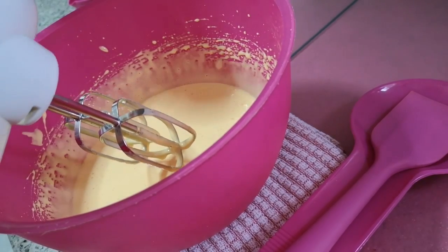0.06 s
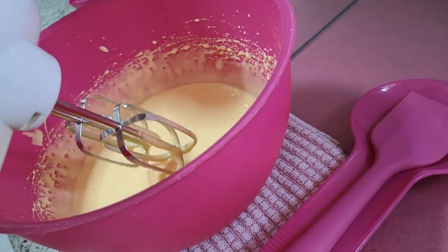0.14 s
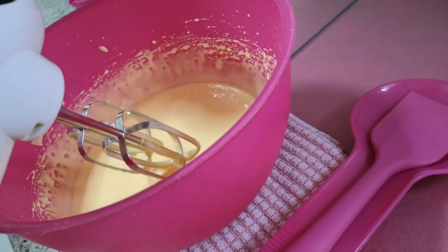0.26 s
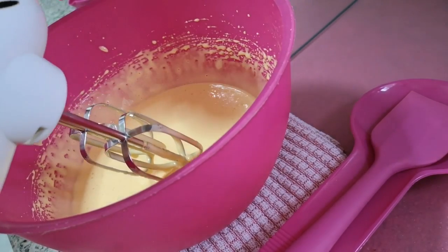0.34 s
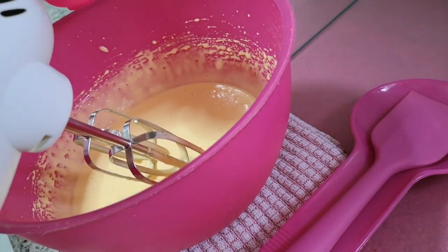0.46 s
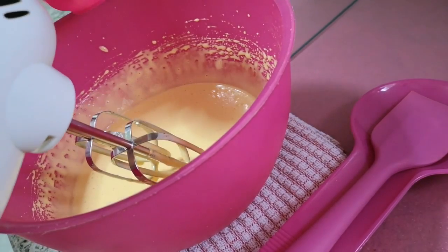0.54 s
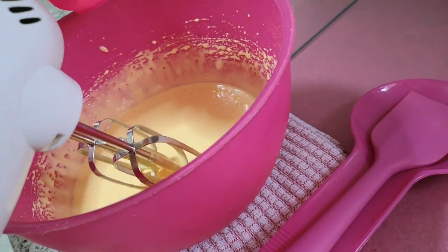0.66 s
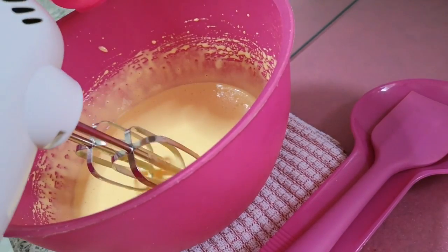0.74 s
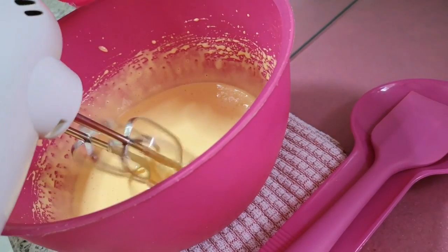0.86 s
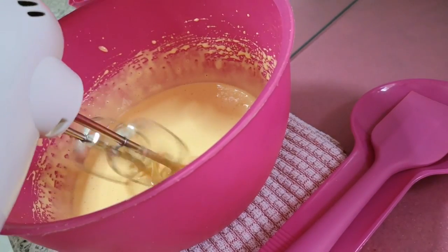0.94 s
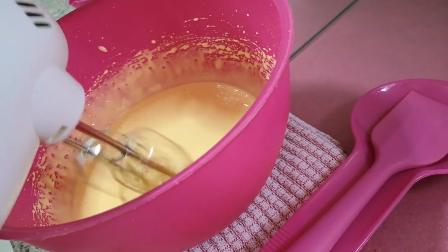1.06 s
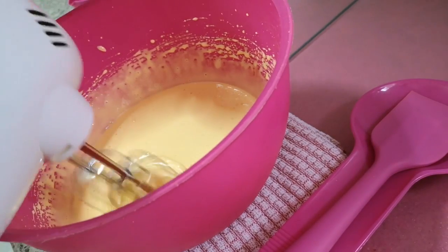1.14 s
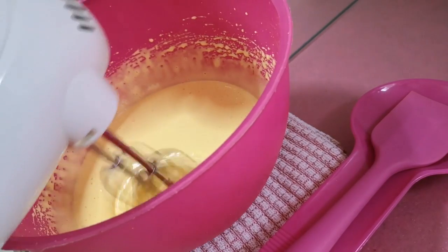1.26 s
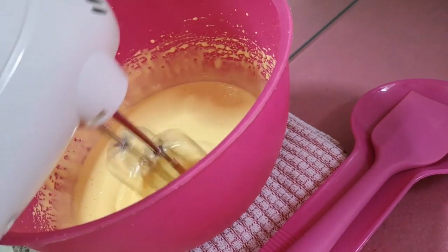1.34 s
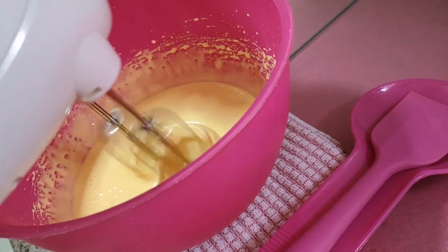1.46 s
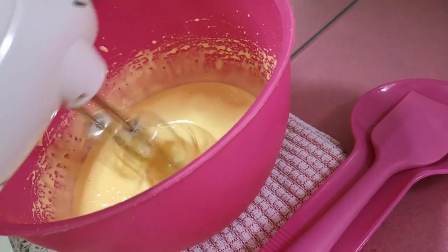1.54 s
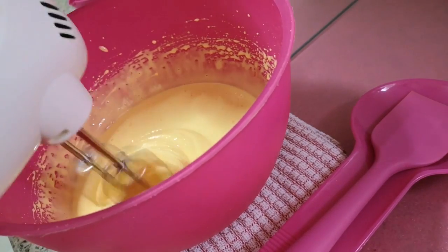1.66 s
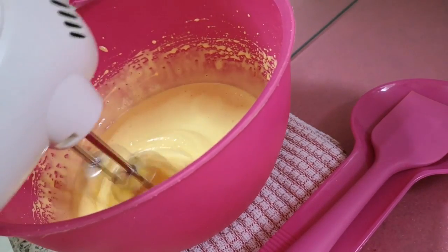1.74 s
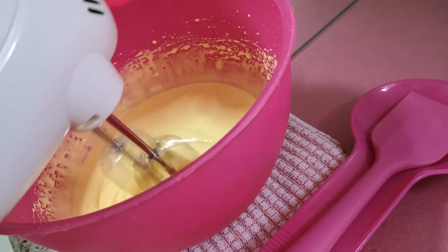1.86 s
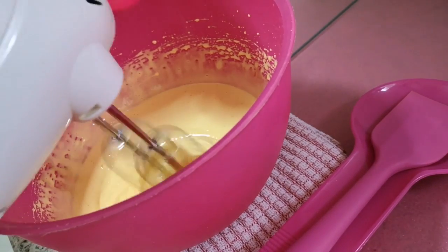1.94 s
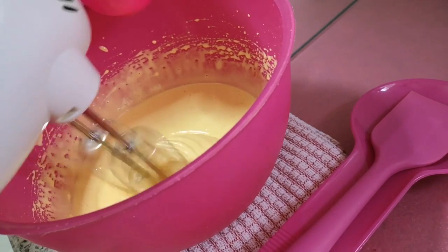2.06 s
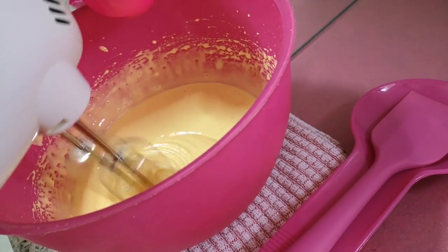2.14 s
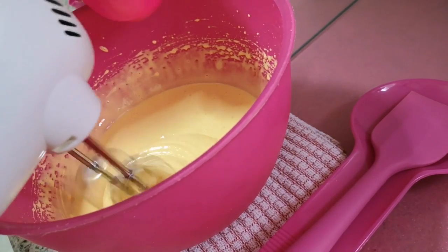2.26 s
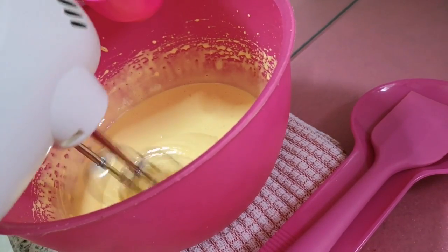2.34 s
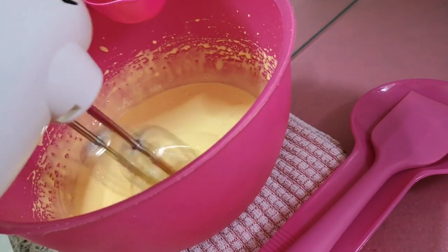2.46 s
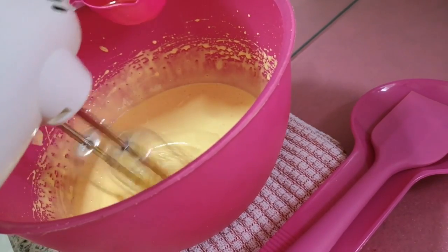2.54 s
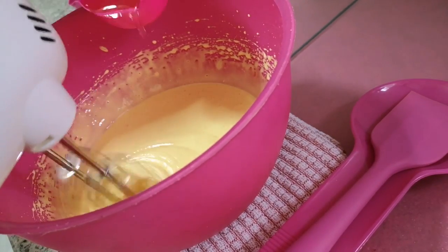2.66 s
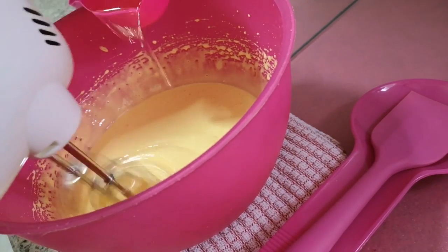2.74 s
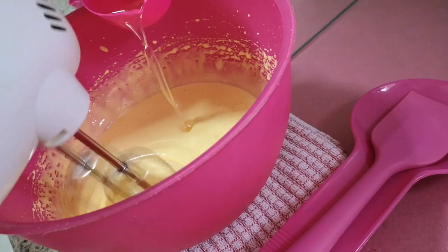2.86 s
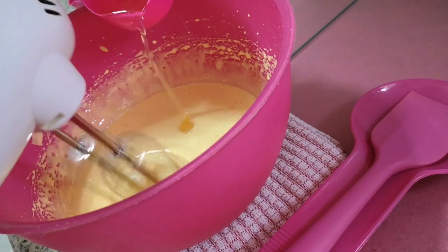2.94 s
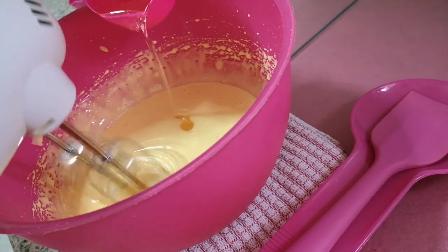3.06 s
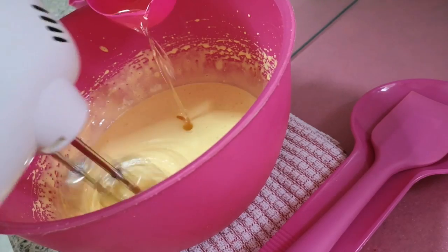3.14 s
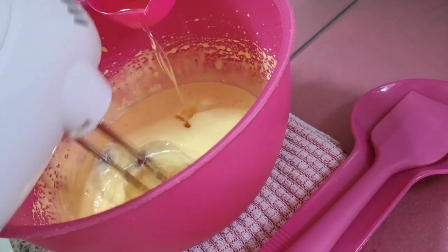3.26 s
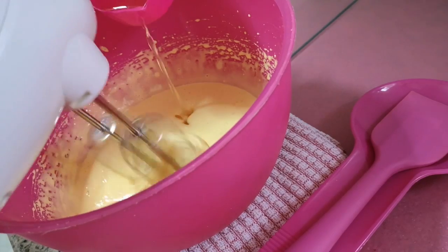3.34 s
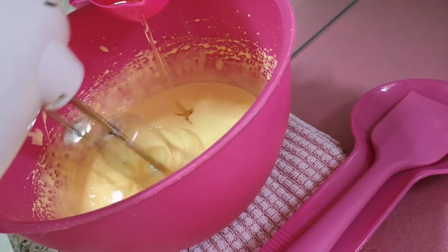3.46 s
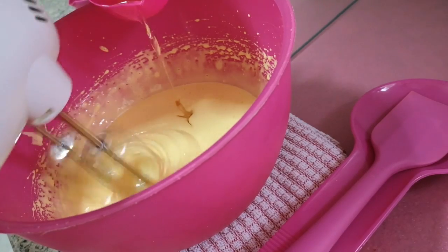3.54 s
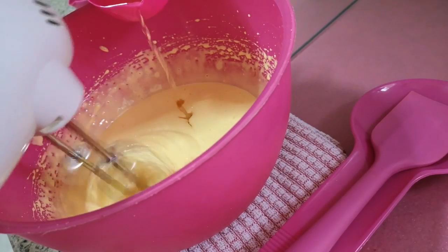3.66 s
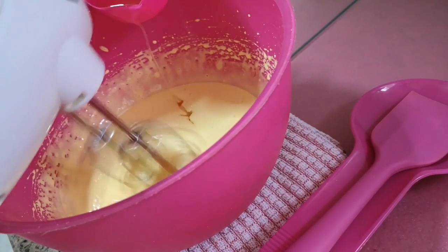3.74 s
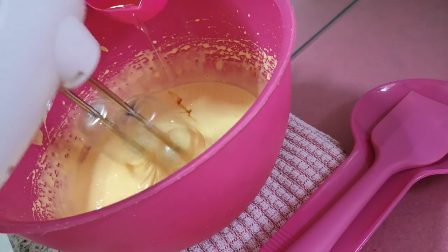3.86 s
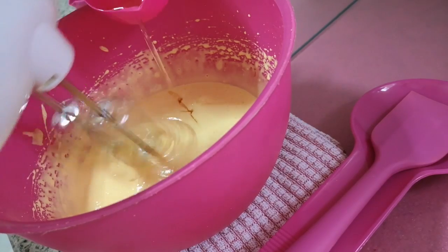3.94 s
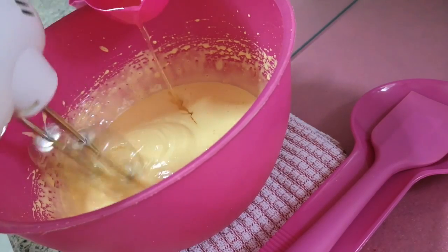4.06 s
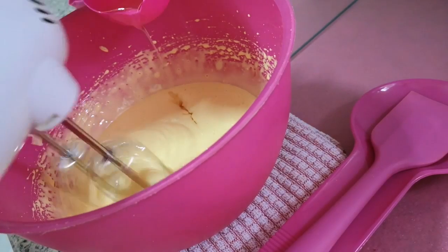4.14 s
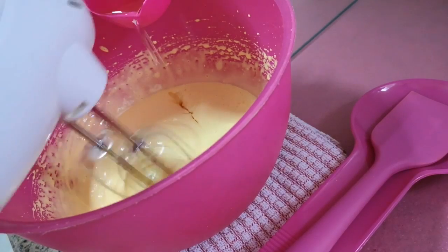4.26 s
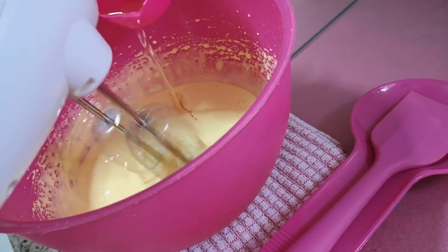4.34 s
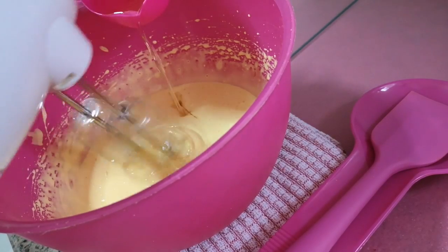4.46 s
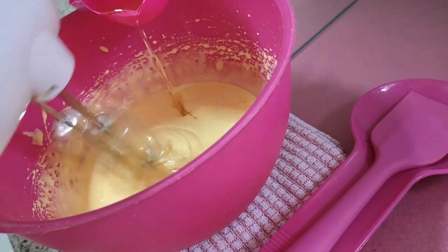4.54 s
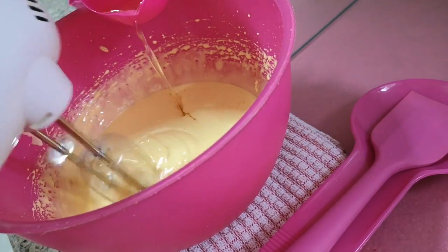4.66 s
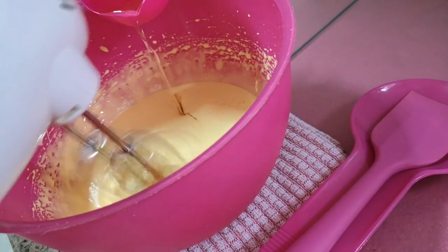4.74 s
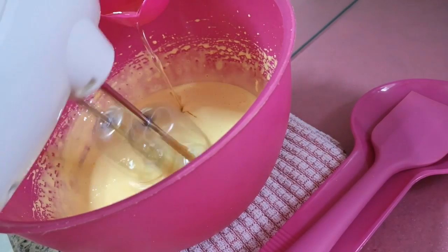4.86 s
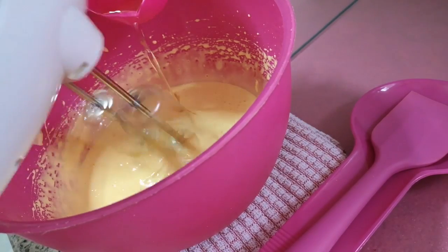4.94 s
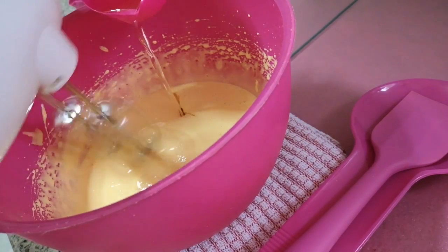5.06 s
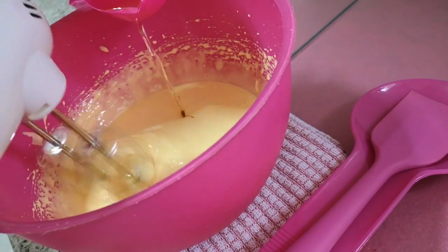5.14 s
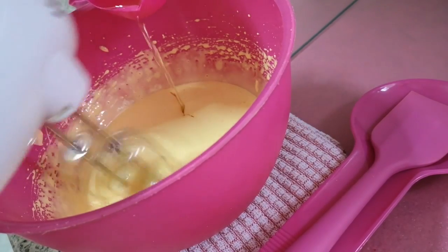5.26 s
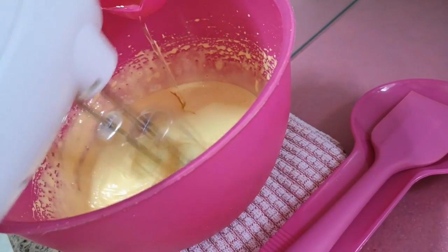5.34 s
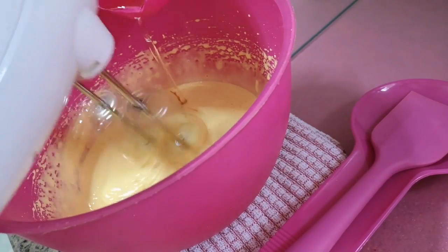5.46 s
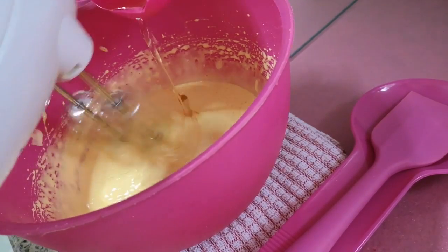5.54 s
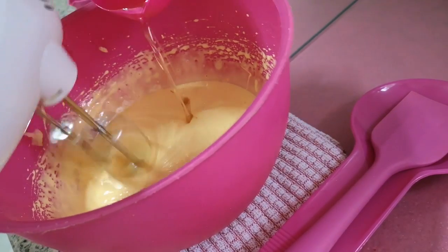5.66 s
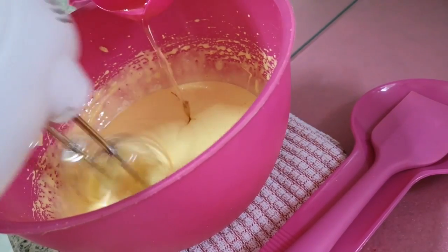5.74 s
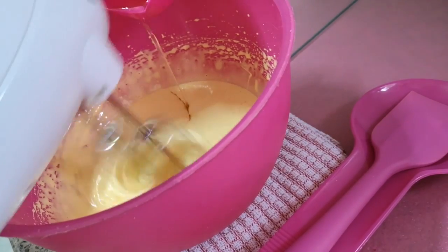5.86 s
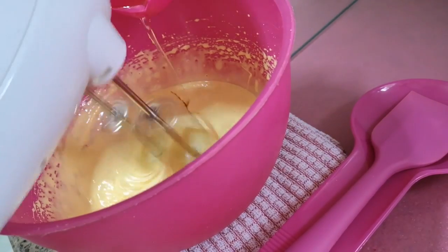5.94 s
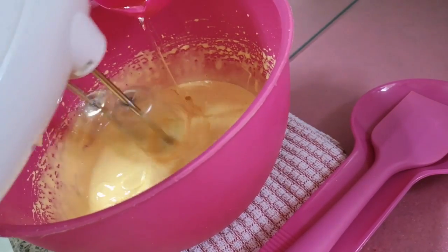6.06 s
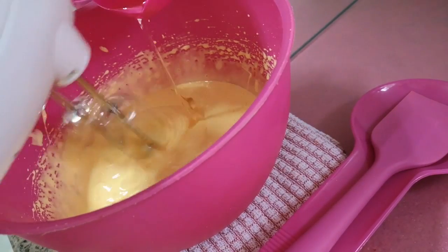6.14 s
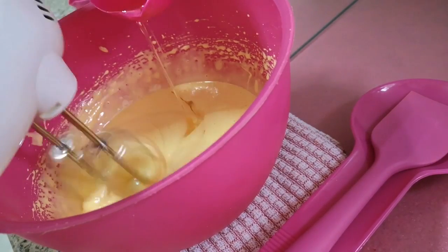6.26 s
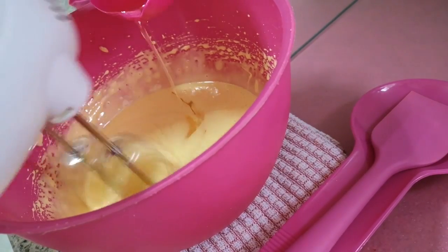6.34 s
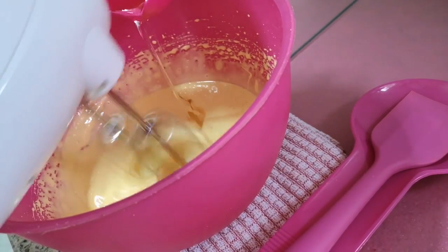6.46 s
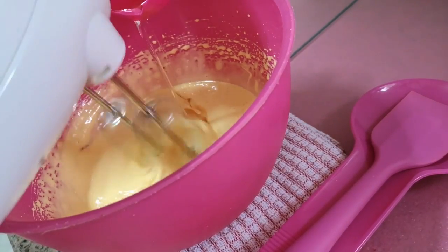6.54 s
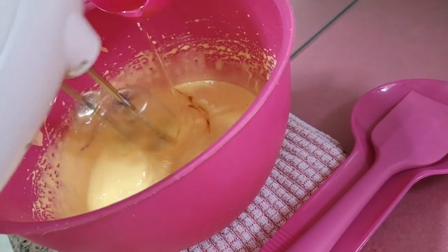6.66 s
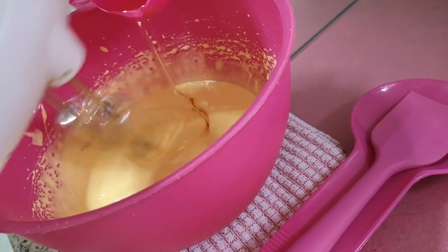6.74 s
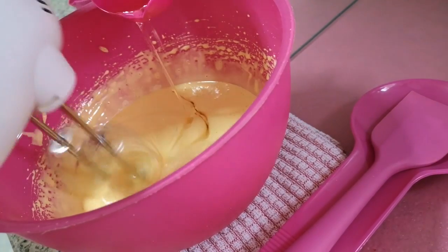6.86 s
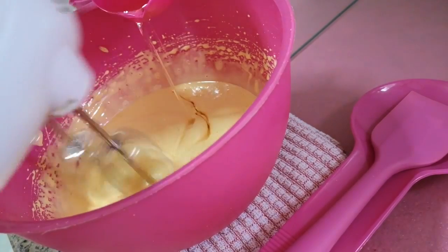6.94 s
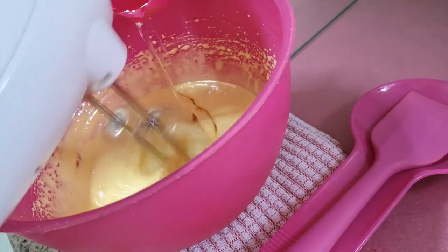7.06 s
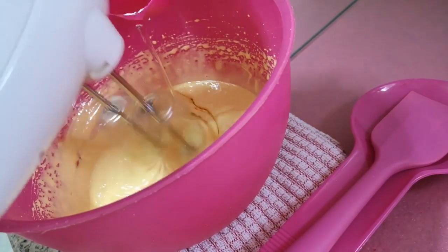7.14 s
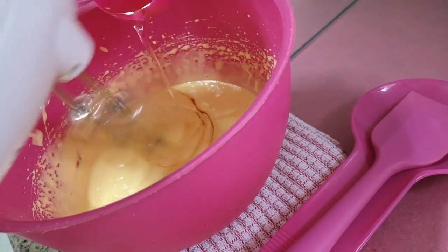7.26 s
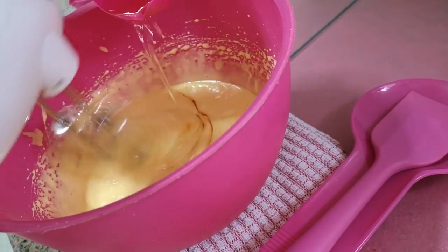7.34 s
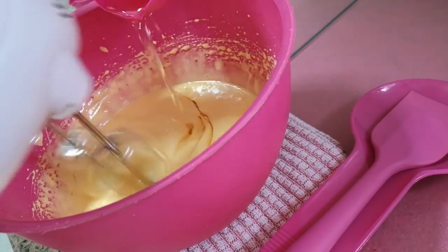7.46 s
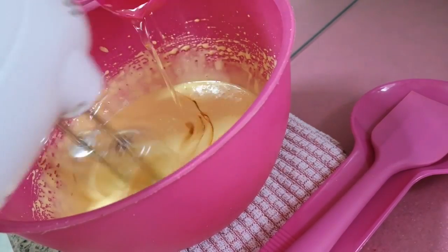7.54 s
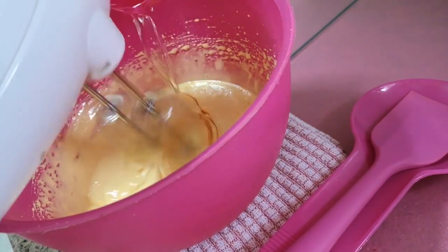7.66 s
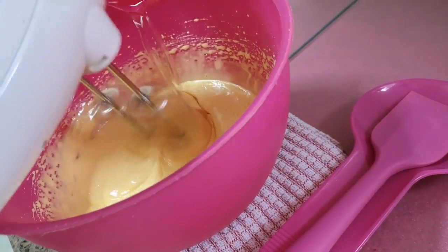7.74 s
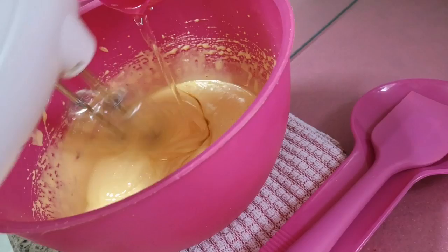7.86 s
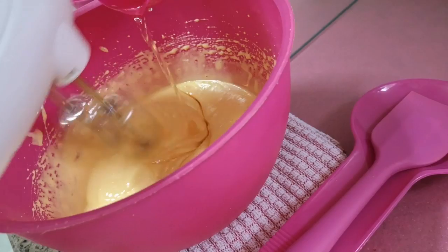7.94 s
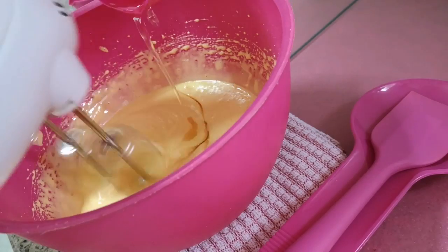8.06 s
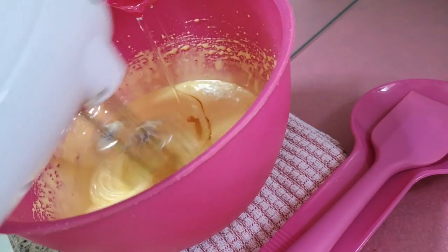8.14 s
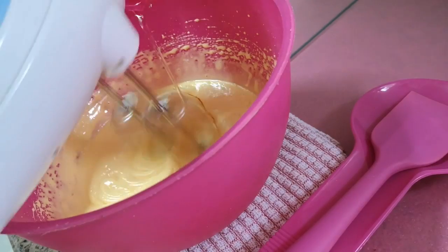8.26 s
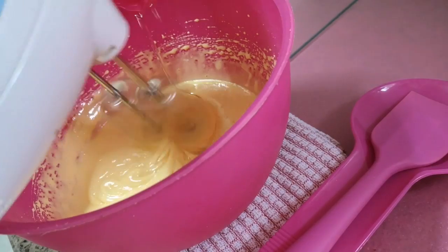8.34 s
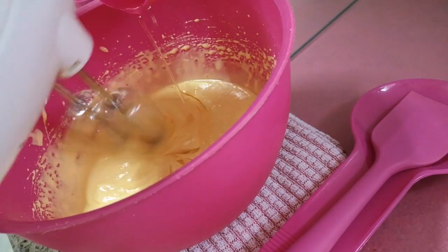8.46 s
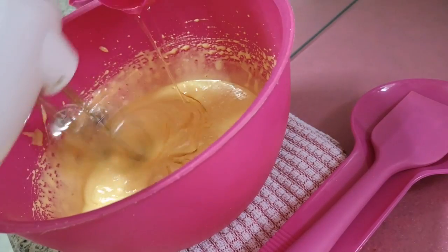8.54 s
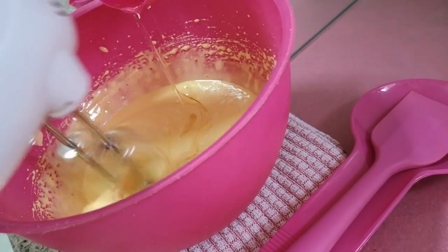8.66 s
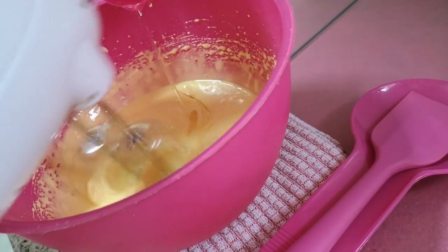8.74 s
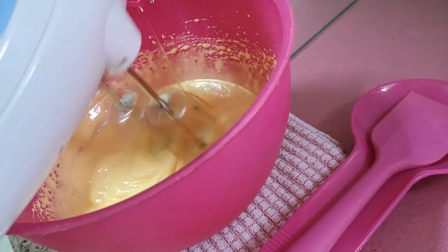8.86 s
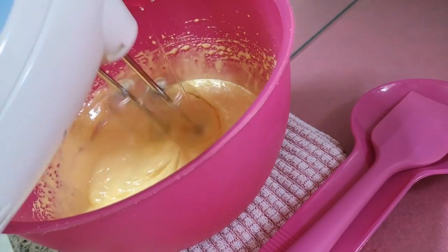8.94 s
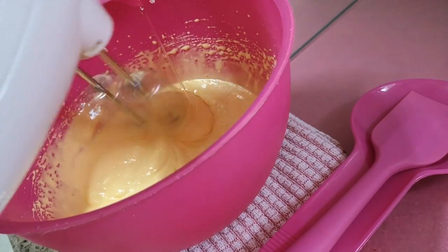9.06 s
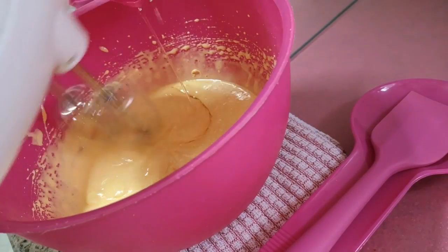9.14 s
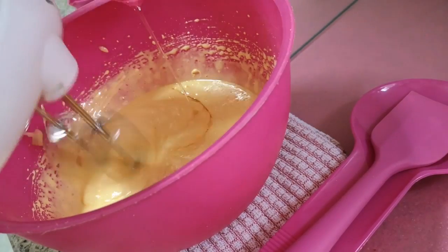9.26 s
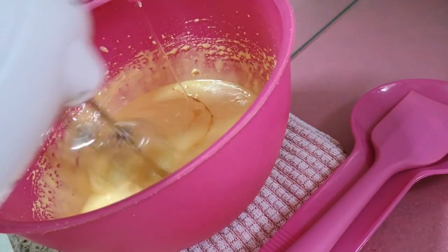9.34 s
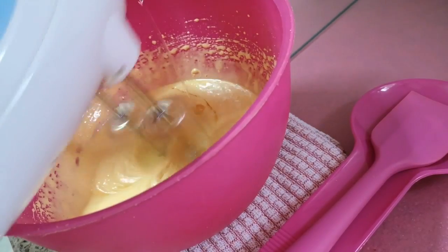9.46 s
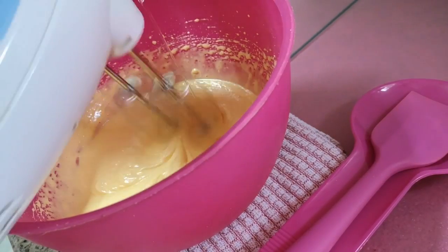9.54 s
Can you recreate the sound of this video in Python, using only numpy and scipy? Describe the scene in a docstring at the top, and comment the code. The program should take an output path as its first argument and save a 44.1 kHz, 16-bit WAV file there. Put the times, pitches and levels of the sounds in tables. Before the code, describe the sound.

Quiet kitchen with faint low rumble and a brief dropout, then plastic clicks, a soft bowl bump and grip rustle. At about one second a sharp click and short metallic clank start a hand mixer; it growls upward fast and settles into dense steady rattle, hum and wavering whine. Blades drum the bowl in short bursts. Close stereo microphone, little reverberation.

```python
"""A switch clicks, a hand mixer bumps a plastic bowl, and its motor growls up to speed with a rising fan whine.
Gears and beaters then rattle steadily as it whips batter; now and then the blades drum on the bowl.
One rotor speed curve drives rattle, hum, whine and air: shaped noise rings the housing, sines follow the turns.
Clicks, knocks, a clank and grip rustles are short rings or noise swells over a quiet kitchen floor.
Near the start the sound cuts out for a moment."""
import sys
import numpy as np
from scipy import signal
from scipy.fft import rfft, irfft
from scipy.io import wavfile
from scipy.ndimage import uniform_filter1d

SR = 44100
rng = np.random.default_rng(int(sys.argv[2]) if len(sys.argv) > 2 else 0)


def file_out(sig):
    """Save sig as 16-bit WAV at sys.argv[1]."""
    # one column per channel
    cols = np.atleast_2d(sig).T
    # limit, then scale
    lim = np.clip(cols, -1, 1)
    pcm = np.round(lim * 32767).astype(np.int16)
    wavfile.write(sys.argv[1], SR, pcm)


N = 423801
TIME, FREQS = np.arange(N) / SR, np.fft.rfftfreq(N, 1 / SR)
TOP_SPEED = 364  # nominal working speed, rotor turns per second
GEAR_RATIO = 21  # rotor turns per beater turn


def amp(db):
    """Decibels to gain."""
    return 10 ** (np.asarray(db) / 20)


def unit(x):
    """Scales to rms 1."""
    return x / np.sqrt(np.mean(x ** 2) + 1e-20)


def curves(rows):
    """Each value column of a timed table, interpolated at every sample."""
    s, *columns = np.transpose(rows)
    return [np.interp(TIME, s, c) for c in columns]


def read(points, hz):
    """Reads a spectrum on a log-frequency axis."""
    f, value = np.transpose(points)
    return np.interp(np.log(hz + 1), np.log(f + 1), value)


def shaped(x, gain):
    """Filters by a gain for each frequency."""
    return irfft(rfft(x) * gain, N)


def wander(hz):
    """Random drift of rms 1, up to about hz."""
    return unit(shaped(rng.standard_normal(N), np.exp(-(FREQS / hz) ** 2)))


def bell(x, centre, half_width):
    """A Gaussian bump of height 1; half_width is its standard deviation."""
    return np.exp(-.5 * ((x - centre) / half_width) ** 2)


def swells(rows):
    """Gain of a row of events that each rise and fall smoothly."""
    return sum(amp(db) * bell(TIME, s, half) for s, half, db in rows)


def lift(rings, hz):
    """Decibels that a set of resonances adds at hz."""
    return sum(db * bell(hz, centre, width) for centre, width, db in rings)


def add(mix, s, sound):
    """Mixes a sound in at s seconds."""
    part = mix[..., round(s * SR):][..., :sound.shape[-1]]
    part += sound[..., :part.shape[-1]]


def tone(phase, pan_db, lead):
    """A sine in two channels, panned left by pan_db, with the left leading by lead radians."""
    left = amp(pan_db / 2) * np.cos(phase + lead)
    right = amp(-pan_db / 2) * np.cos(phase)
    return np.sqrt(2) * np.array([left, right])


def room_floor(spread=.45, floor_db=-59.5):
    """Low rumble and faint hiss of the quiet kitchen, as shaped noise."""
    # relative noise spectrum: (frequency [Hz], level [dB per Hz])
    floor_spectrum = [(20, 2), (45, 2), (65, -3), (100, 2), (150, -8), (230, -20), (330, -20), (480, -30),
                      (800, -29), (1800, -24), (4000, -35), (15000, -50)]
    mid, side = shaped(rng.standard_normal((2, N)), amp(read(floor_spectrum, FREQS)))
    return amp(floor_db) * unit(np.array([mid + spread * side, mid - spread * side]))


def housing_gain():
    """The broad rattle spectrum with the resonances of the mixer and bowl standing on it."""
    # broad relative spectrum of the rattle: (frequency [Hz], level [dB per Hz])
    rattle_spectrum = [(30, -35), (100, -11.5), (170, -12.5), (260, -9), (430, 1), (620, -12.5), (720, -14),
                       (800, -8), (1300, -7.5), (2400, -3.5), (4000, -7.5), (6300, -18), (10500, -20),
                       (15500, -28.5)]
    # resonances of housing, beaters and bowl: (frequency [Hz], half width [Hz], lift [dB])
    housing_rings = [(200, 8.2, 3.5), (516, 25, 6.5), (759, 7.7, 6), (866, 195, 4.5), (1040, 31, 2),
                     (1269, 27, 7), (1597, 150, 4.5), (1855, 87, 8.5), (2028, 21, 7.5), (2260, 131, 7),
                     (2598, 60, 6.5), (2709, 38, 6.5), (2996, 76, 7), (3200, 130, 1.5), (4270, 36, 4),
                     (4820, 186, 4.5), (5640, 410, 7.5), (6974, 385, 7.5), (7740, 244, 6.5), (8140, 66, 5),
                     (9310, 430, 8.5), (11600, 215, 2.3)]
    return amp(read(rattle_spectrum, FREQS) + lift(housing_rings, FREQS))


def grip_rustle(grain_db=3):
    """Skin rubs the plastic housing in small uneven slips as the hand shifts its grip."""
    # grip shifts: (time [s], half length [s], level [dB])
    grips = [(.4, .018, -67), (.822, 0.026, -63), (.935, 0.017, -60)]
    rub = shaped(rng.standard_normal((2, N)), housing_gain() * FREQS / (FREQS + 900))
    return swells(grips) * unit(rub * amp(grain_db * wander(120)))


def switch_clicks(ring_t60=0.038, click_db=1):
    """The switch snaps and the gears take up play; each click is a brief decaying noise ring of plastic."""
    # clicks, levels before trim: (time [s], level [dB], treble tilt [dB], left-right [dB])
    clicks = [(.6068, -25.5, 9, 5), (0.628, -33, -7, 2.5), (.6555, -45, 4, 0), (.8032, -41.5, -38, 7),
              (.8975, -50, 1, 3.5), (.917, -50, -15, 4.5), (0.9616, -23, 17, 1), (0.978, -22, -19, 5)]
    # click spectrum: (frequency [Hz], level [dB])
    click_colour = [(200, -16), (700, -7), (1500, -3), (2900, 0.5), (4000, -3), (6000, -11), (9000, -16),
                    (15000, -20)]
    out, t = np.zeros((2, N)), np.arange(4096) / SR
    hz = np.fft.rfftfreq(len(t), 1 / SR)
    treble = hz ** 2 / (hz ** 2 + 3500 ** 2)
    for s, db, treble_db, pan_db in clicks:
        colour = amp(read(click_colour, hz) + treble_db * treble)
        noise = rng.standard_normal((2, len(t)))
        ring = unit(irfft(rfft(noise) * colour)) * amp(-60 * t / ring_t60)
        sides = amp([[pan_db / 2], [-pan_db / 2]])
        add(out, s, 0.57 * amp(db + click_db) * sides * ring)
    return out


def bowl_knocks(speed, knock_db=-5, soft_s=0.0021, jitter_s=0.002, beater_blades=4):
    """Blade after blade strikes the damped plastic bowl; the batter softens each attack."""
    # knocks on the bowl, levels before trim: (time [s], level [dB], blade strikes [count])
    knocks = [(.803, -25.5, 1), (4.183, -23, 3), (5.775, -18, 3), (6.318, -20.5, 3), (6.893, -14, 3),
              (8.683, -21, 3), (8.741, -24, 2)]
    # decaying modes of the bowl: (frequency [Hz], relative level [dB], t60 [s])
    bowl_modes = [(79, 2, 0.042), (102, 1, 0.091), (138, -1.5, 0.069), (207, -6.5, 0.2), (306, -2.5, 0.064),
                  (1730, -19, 0.06)]
    out, t = np.zeros(N), np.arange(SR // 4) / SR
    thud = sum((-1) ** k * amp(db - 60 * t / t60) * np.sin(2 * np.pi * hz * t)
               for k, (hz, db, t60) in enumerate(bowl_modes))
    thud *= 1 - np.exp(-t / soft_s)
    for s, db, count in knocks:
        blade_gap = GEAR_RATIO / beater_blades / max(np.interp(s, TIME, speed), 1)
        for k in range(count):
            late = k * blade_gap + min(k, 1) * jitter_s * rng.uniform(-0.8, 1)
            strength = np.sin(np.pi * (k + 1) / (count + 1))  # a group swells and fades
            add(out, s + late, amp(db + knock_db) * strength * thud)
    return out


def rotor_speed(start_s=.939, surge_share=.465, surge_s=.104, creep_s=.512):
    """Rotor turns per second: a quick surge, then a slow creep to the working speed."""
    # the batter gives way or holds back a little: (time [s], speed gained [turns/s])
    ease = [(1.1, 0), (1.23, -11), (1.38, 1), (2, -2.5), (2.8, -.2), (4, -.2), (5.3, 3), (6.2, -.2),
            (9, .6)]
    age = np.maximum(TIME - start_s, 0)
    missing = surge_share * np.exp(-age / surge_s) + (1 - surge_share) * np.exp(-age / creep_s)
    return (TOP_SPEED + curves(ease)[0]) * (1 - missing)


def slip(speed):
    """1 at a standstill, 0 at working speed."""
    return np.clip(1 - speed / TOP_SPEED, 0, 1)


def draught(speed, stream_db=-54.5, corner_hz=75, spread=0.3):
    """Lumpy low rumble of cooling air at the microphones: a stream that grows with speed, and puffs."""
    # puffs from the motor: (time [s], half length [s], level [dB])
    puffs = [(5.12, .04, -53), (7.32, .04, -49), (7.92, .08, -45), (8.37, 0.075, -38), (8.59, .04, -43),
             (9.13, .05, -43)]
    rumble = FREQS / (FREQS + 8) / (1 + (FREQS / corner_hz) ** 3)
    mid, side = shaped(rng.standard_normal((2, N)), rumble)
    level = amp(stream_db) * speed / TOP_SPEED + swells(puffs)
    return level * unit(np.array([mid + spread * side, mid - spread * side]))


def starting_growl(speed, turns, growl_db=-42, second_db=-11, pulsing=0.88, grind_db=2, mains_db=-37,
                   mains_decay=0.12, mains_hz=50, rotor_slots=12, inrush_s=0.29, inrush_fall_s=.012):
    """Slots pass the poles, pulsed by mains half waves; tone and octave sweep stator rings till current falls."""
    # stator resonances: (frequency [Hz], half width [Hz], lift [dB])
    stator_rings = [(780, 99, -12), (1800, 160, 14), (2690, 260, 17.5)]
    slots = 2 * np.pi * rotor_slots * turns + .55 * wander(130)
    slot_hz = rotor_slots * speed
    age = np.maximum(TIME - .948, 0)
    half_waves = 4 * np.pi * mains_hz * age  # twice the mains frequency
    pull = amp(lift(stator_rings, slot_hz)) * tone(slots, pan_db=5, lead=0.33)
    pull += amp(second_db + lift(stator_rings, 2 * slot_hz)) * tone(2 * slots, pan_db=2, lead=.5)
    inrush = (1 - np.tanh((age - inrush_s) / inrush_fall_s)) / 2  # starting current holds, then falls
    pulses = 1 + pulsing * np.cos(half_waves)
    growl = amp(growl_db) * inrush * pulses * unit(amp(grind_db * wander(70))) * pull
    mains = amp(mains_db) * np.exp(-age / mains_decay) * tone(half_waves, pan_db=5, lead=0)
    current = np.clip(age / .02, 0, 1)
    return current ** 2 * np.sqrt(slip(speed)) * growl + np.sqrt(current) * mains


def ports(direct, diffuse):
    """Two microphone ports hear a shared and a scattered part, with the left shaded in a frequency pattern."""
    # left-right balance: (frequency [Hz], left-right [dB])
    balance = [(150, -1.5), (300, -1.5), (360, -2.5), (520, -7), (700, -3), (1500, -4.5), (1750, -2),
               (2000, -5.5), (3400, -3), (4000, -6), (6000, -10), (9400, -15), (11300, 0.5), (13500, -4.5)]
    # likeness of the two ports: (frequency [Hz], shared share [0-1])
    likeness = [(100, 0.98), (400, 0.89), (520, 0.92), (650, 0.49), (900, 0.91), (1500, 0.72), (2000, 0.41),
                (4400, 0.31), (7000, 0.1), (12000, .05)]
    # phase by which the left leads: (frequency [Hz], lead [radians])
    left_lead = [(0, 1), (260, 0.5), (780, -5), (1550, -6), (2410, -9.5), (2670, -12), (3010, -12),
                 (3450, -5), (4310, -3.5), (6460, -4.5), (10200, -17.5), (13800, -19), (15800, -2.4),
                 (16600, -3.3)]
    same, tilt_db = np.clip(read(likeness, FREQS), 0, 1), read(balance, FREQS)
    left = shaped(direct, same * np.exp(1j * read(left_lead, FREQS)))
    left += shaped(diffuse, np.sqrt(1 - same ** 2))
    sides = np.array([amp(tilt_db), np.ones_like(tilt_db)])
    return shaped(np.array([left, direct]), sides / np.sqrt(np.mean(sides ** 2, axis=0)))


def reflections(x, size, sway_s=.00012, count=4):
    """Echoes off bowl and worktop ripple the spectrum; the ripples drift as the mixer is moved about."""
    treble, sway = shaped(x, FREQS / (FREQS + 1600)), wander(1.23)
    out = x.copy()
    delays = rng.uniform(0.002042, .007, count)  # seconds
    leans = rng.uniform(-0.54, 1, count)  # how far each echo follows the sway
    signs = rng.choice([-1, 1], count)
    for delay, lean, sign in zip(delays, leans, signs):
        out += sign * size * np.interp(TIME - delay - sway_s * lean * sway, TIME, treble)
    return out


def stirred(pair, patch_db=0.96, flutter_db=1.1, flare_width=0.042):
    """Circling the bowl turns resonances to the ports and away; the beaters' depth reweights the bands."""
    # depth of the beaters in the batter: (time [s], depth [dB at band weight 1])
    depth_curve = [(1, 2.5), (1.55, -2), (1.95, -0.9), (3, -1.7), (3.9, -0.7), (4.9, -0.9), (5.8, -0.3),
                   (7.4, 0.76), (8.3, 0), (9.6, 1.1)]
    # single resonances stand out for a moment: (time [s], half length [s], frequency [Hz], lift [dB])
    flare_events = [(1.37, .1, 2650, 5), (1.6, 0.27, 1520, 2), (2.5, 0.11, 5680, 2), (3, 0.27, 9350, 3.5),
                    (6.15, .22, 5030, 1.5), (8.457, 0.16, 1310, 7)]
    hz, t, z = signal.stft(pair, SR, nperseg=1024, noverlap=768)
    slow, fast = rng.standard_normal((2, len(hz), len(t)))
    patches = unit(uniform_filter1d(uniform_filter1d(slow, size=9, axis=0), size=48, axis=1))
    flutter = unit(uniform_filter1d(uniform_filter1d(fast, size=5, axis=0), size=5, axis=1))
    depth = np.interp(t, *np.transpose(depth_curve))
    # response to depth: (Hz, weight)
    weight = read([(500, -0.2), (900, -0.34), (1280, 1.0), (1550, -2.8), (1900, 0.35), (2650, -1.35),
                   (4000, -0.14), (7000, -0.032)], hz)
    flares = sum(db * bell(t, s, half) * bell(hz[:, None], f, flare_width * f)
                 for s, half, f, db in flare_events)
    z = z * amp(patch_db * patches + flutter_db * flutter + flares + weight[:, None] * depth)
    return signal.istft(z, SR, nperseg=1024, noverlap=768)[1][:, :N]


def gear_rattle(speed, turns, throb=0.015, chatter=0.025, tooth_share=0.3, teeth_per_s=2500, uneven_db=0.34):
    """Tooth impacts and brush friction ring the housing, throbbing twice per beater turn; speed brightens it."""
    # levels at working speed, and how much weaker each is at a standstill [dB]
    rattle_db, rattle_slow_db, rattle_bend = -21, 41.5, 2.97
    sizzle_db, sizzle_slow_db = -4, 16  # treble, relative to the rattle
    jolt_s, jolt_length_s, jolt_db = 0.96, 0.025, -24.5  # the gears shudder as they take up the drive
    beater = 2 * np.pi * (turns / GEAR_RATIO + 0.066 * wander(2.3))
    load = 1 + throb * np.cos(2 * beater) + chatter * wander(90)
    impacts = rng.random((2, N)) < teeth_per_s / SR
    teeth = unit(impacts * rng.uniform(-0.81, 1, (2, N)))
    friction = rng.standard_normal((2, N))
    drive = load * (tooth_share * teeth + friction)
    heard = ports(*shaped(drive, housing_gain()))
    pair = stirred(np.array([reflections(side, size=.16) for side in heard]))
    high = 1 / (1 + (3800 / (FREQS + 1)) ** 8)
    body, sizzle = unit(shaped(pair, 1 - high)), unit(shaped(pair, high))
    level = amp(rattle_db - rattle_slow_db * slip(speed) ** rattle_bend + uneven_db * wander(3.9))
    jolt = amp(jolt_db) * bell(TIME, jolt_s, jolt_length_s)
    return (level + jolt) * body + level * amp(sizzle_db - sizzle_slow_db * slip(speed)) * sizzle


def rotor_hum(speed, turns, hum_db=-42, drone_db=-1, blur=0.65, drift=1.35, flutter_db=2.0, low_cut_hz=120):
    """Unbalance hums once a turn; the batter's uneven load adds a blurred drone of beater orders just below."""
    # drag of the batter on the gears, before trim: (time [s], drone level [dB])
    drag = [(1.2, -46), (1.6, -37), (3.9, -32), (4.12, -42), (4.28, -29), (4.55, -30), (4.7, -33.5),
            (5.3, -31), (5.7, -33), (9.6, -33.5)]
    # beater orders in the drone: (multiple of beater speed, relative level [dB])
    drone_orders = [(17, -6.5), (18, -3), (19, 3.5), (20, -5)]
    # the casing answers the unbalance: (frequency [Hz], half width [Hz], lift [dB])
    casing_rings = [(337, 21.6, 9.5), (202, 70, 9.5)]
    angle, load = 2 * np.pi * turns, 1 - slip(speed)
    hum_level = amp(hum_db + lift(casing_rings, speed) + 2.0 * wander(17))
    hum = hum_level * tone(angle + .4 * load * wander(18), pan_db=-3.5, lead=-1.33)
    drone = 0
    for order, db in drone_orders:
        phase = order * angle / GEAR_RATIO + blur * wander(26) + drift * wander(5.3)
        drone = drone + amp(db) * tone(phase, pan_db=-3.0, lead=-0.5)
    drone = unit(amp(flutter_db * wander(36)) * drone)
    return hum / (1 + (low_cut_hz / (speed + 1)) ** 4) + amp(curves(drag)[0] + drone_db) * drone


def fan_whine(speed, turns, whine_db=-1, half_db=-8, octave_db=-15, brush_db=-51, rough=0.23,
              fan_blades=10, rotor_slots=12, stroke_s=0.12, away_db=-46):
    """Fan blades whistle with an octave below and above, swelling at strokes; the commutator sings higher."""
    # stirring strokes swing the vents to the microphones: (time [s], whine level before trim [dB])
    strokes = [(1.53, -38), (1.72, -30), (2.3, -38), (2.82, -33), (3.15, -30.5), (3.65, -34.5),
               (4.2, -34.5), (4.74, -33.5), (5.18, -36.5), (5.65, -50), (6.15, -47), (6.45, -43),
               (7.05, -43), (7.58, -36), (8.2, -43), (8.76, -39), (9.13, -38)]
    angle = 2 * np.pi * turns + 0.032 * wander(14)
    blades = fan_blades * angle + rough * wander(150)
    whine = tone(blades, pan_db=0.0, lead=0.17)
    whine += amp(half_db) * tone(blades / 2, pan_db=-2, lead=-0.31)
    whine += amp(octave_db) * tone(2 * blades, pan_db=3, lead=-2.3)
    brush_level = amp(brush_db) * np.clip(TIME - 1.1, 0, 1) * wander(30)
    brushes = brush_level * tone(2 * rotor_slots * angle, pan_db=-16, lead=0.63)
    facing = amp(away_db) + swells([(s, stroke_s, db) for s, db in strokes])
    return speed / TOP_SPEED * facing * amp(whine_db + 3.1 * wander(13)) * whine + brushes


def beater_clank(clank_s=.973, clank_db=-13):
    """The steel beaters ring once, as decaying sines, when the gears catch them."""
    # modes of the beaters: (frequency [Hz], relative level [dB], t60 [s])
    beater_modes = [(766, -18, 0.14), (2060, -12.5, .08), (2700, -28, .1)]
    out, t = np.zeros(N), np.arange(SR // 5) / SR
    ring = sum(amp(db - 60 * t / t60) * np.sin(2 * np.pi * hz * t) for hz, db, t60 in beater_modes)
    add(out, clank_s, amp(clank_db) * ring)
    return out


def kitchen(x):
    """A short diffuse reverb of decaying noise, each band with its own decay time."""
    # reverb decay: (frequency [Hz], t60 [s])
    room_decay = [(100, 0.21), (1000, 0.44), (4000, 0.18), (14000, 0.18)]
    hz, t, z = signal.stft(rng.standard_normal((2, SR // 2)), SR, nperseg=256)
    decay = amp(-60 * t / read(room_decay, hz)[:, None])
    tail = signal.istft(z * decay, SR, nperseg=256)[1]
    return signal.fftconvolve(x, tail / np.linalg.norm(tail[0]), axes=1)[:, :N]


def scene(wet_db=-14):
    """One rotor drives every running sound; handling, knocks and growl also feed the room."""
    # the mixer is swung from mid-bowl over to the right: (time [s], left-right [dB])
    place = [(1, 4.2), (1.6, 1.5), (2.15, 0.1), (3, 0.3), (6, 0.5)]
    speed = rotor_speed()
    turns = np.cumsum(speed) / SR
    powered = np.clip((TIME - .952) / .022, 0, 1) ** 2
    near = switch_clicks() + grip_rustle() + beater_clank() + bowl_knocks(speed)
    near = near + starting_growl(speed, turns)
    running = powered * (gear_rattle(speed, turns) + rotor_hum(speed, turns) + fan_whine(speed, turns))
    pan_db = curves(place)[0]
    placed = running * amp([pan_db / 2, -pan_db / 2])
    return placed + near + amp(wet_db) * kitchen(near) + draught(speed) + room_floor()


def record(dry, edge_hz=15800):
    """The sound cuts out for a moment near the start; then a steep low-pass limits the band."""
    # the silent moment: (start [s], end [s])
    dropout = (.148, .256)
    live = (TIME < dropout[0]) | (TIME > dropout[1])
    gate = uniform_filter1d(live * 1., size=128)  # softened edges
    edge = signal.firwin(511, edge_hz, window=("kaiser", 9), fs=SR)
    return signal.oaconvolve(dry * gate, edge[None], "same")


dry = scene()
out = record(dry)
file_out(out)
```